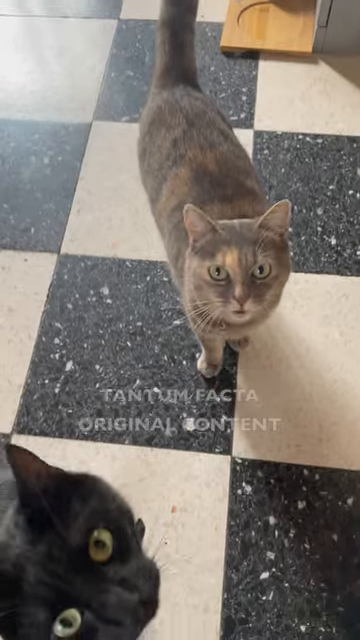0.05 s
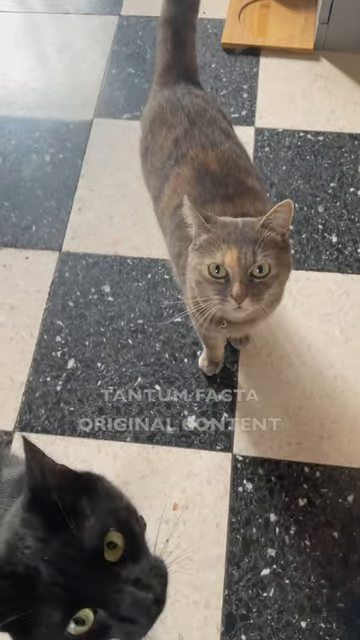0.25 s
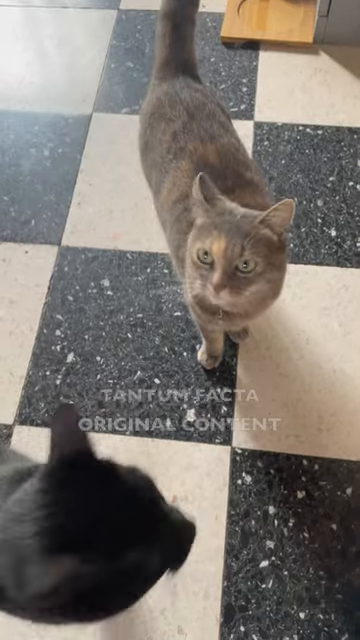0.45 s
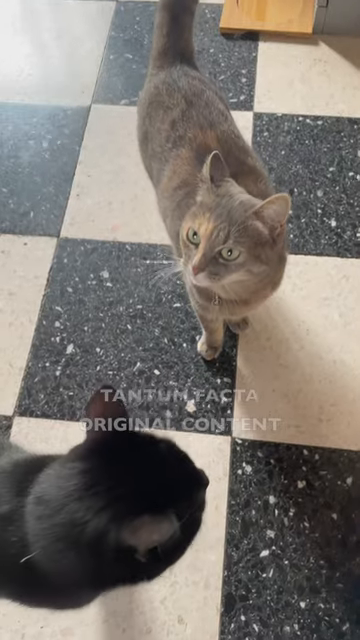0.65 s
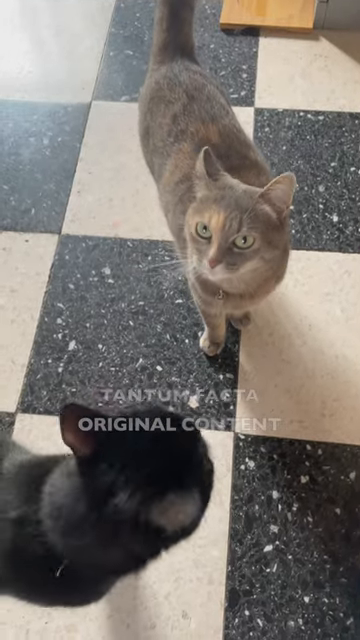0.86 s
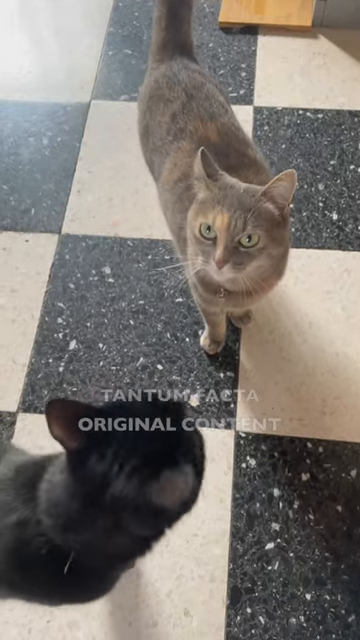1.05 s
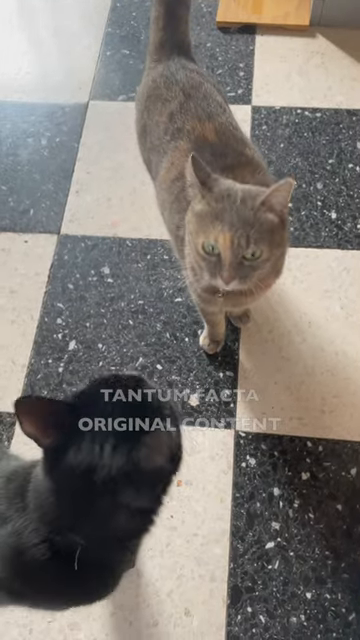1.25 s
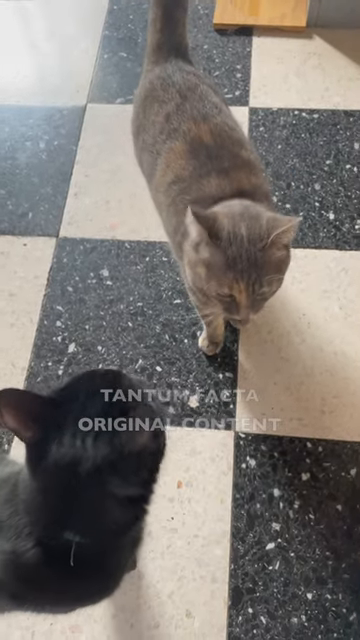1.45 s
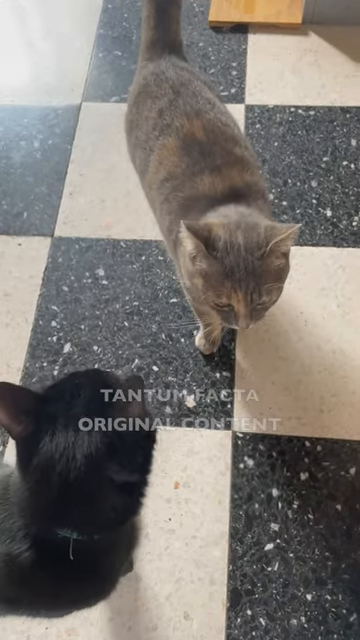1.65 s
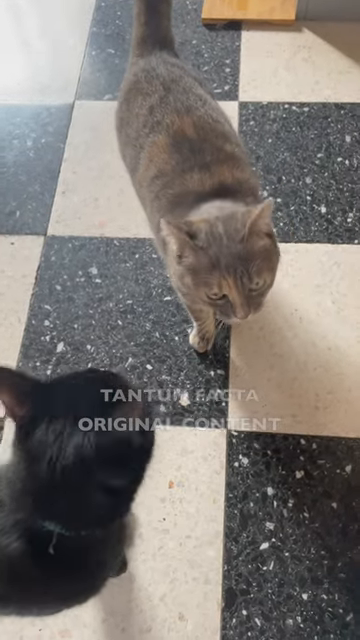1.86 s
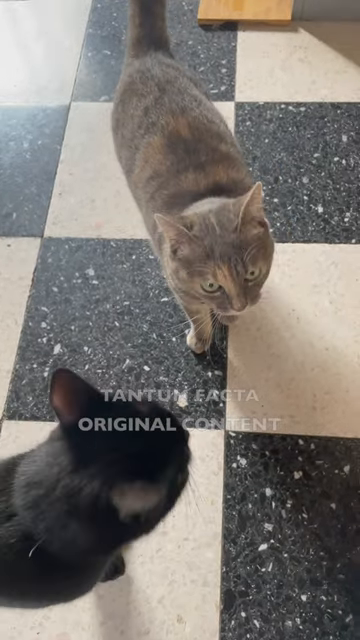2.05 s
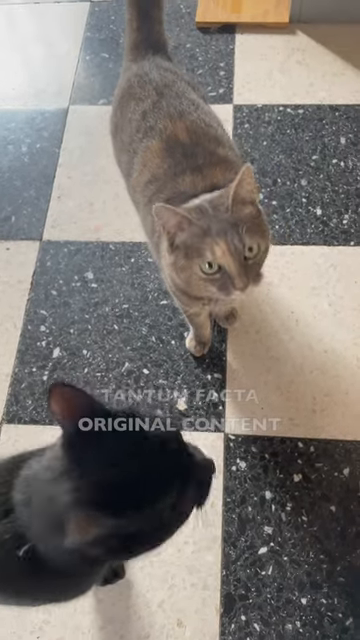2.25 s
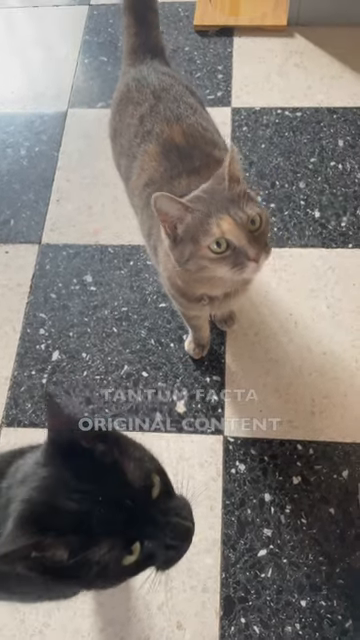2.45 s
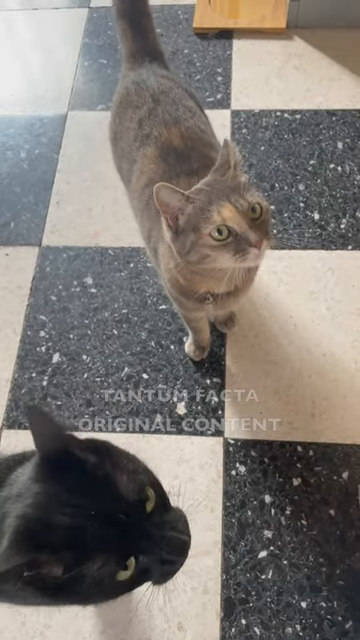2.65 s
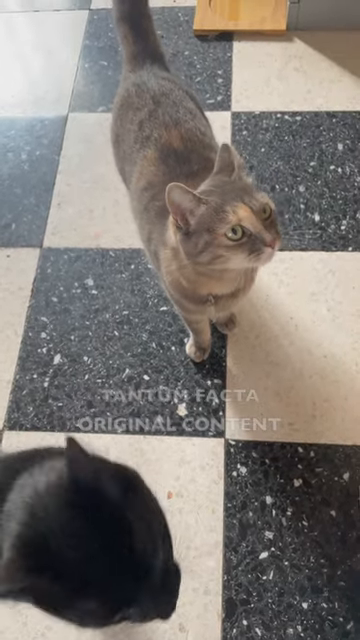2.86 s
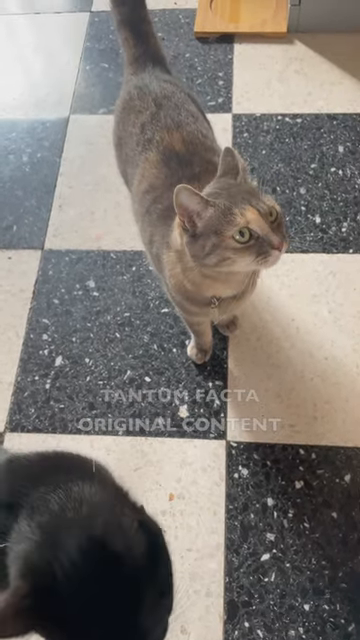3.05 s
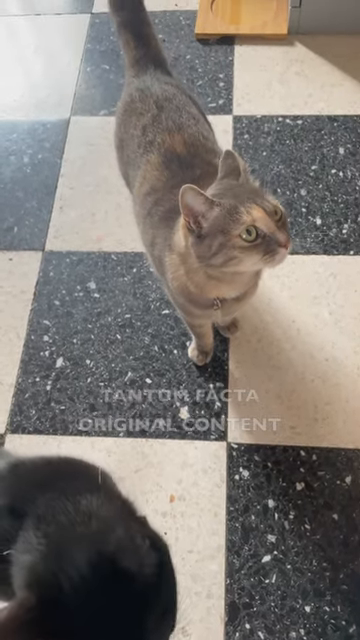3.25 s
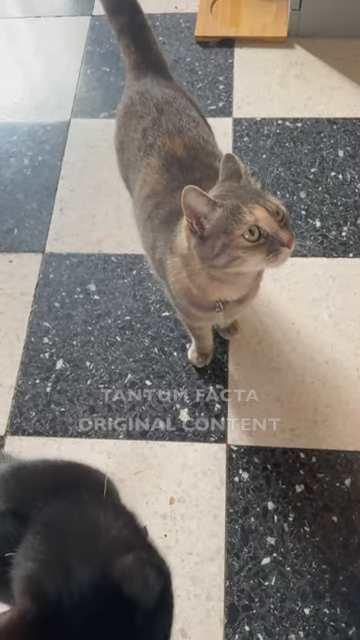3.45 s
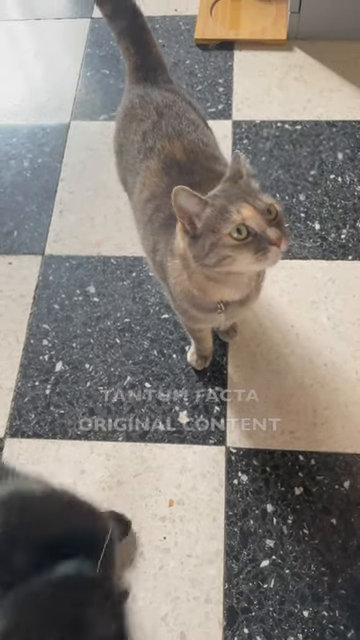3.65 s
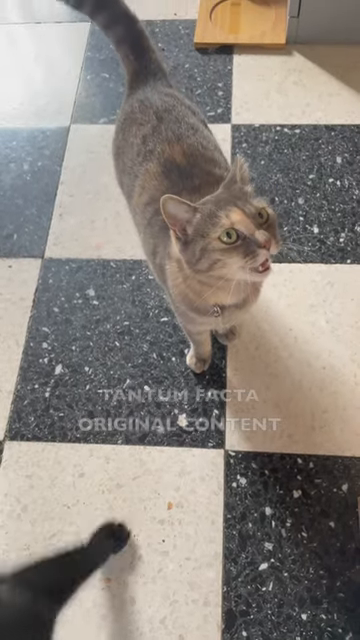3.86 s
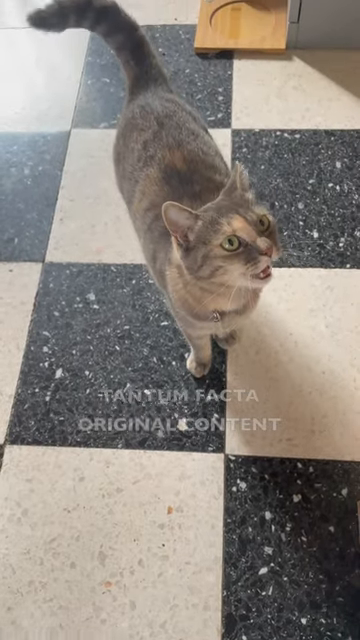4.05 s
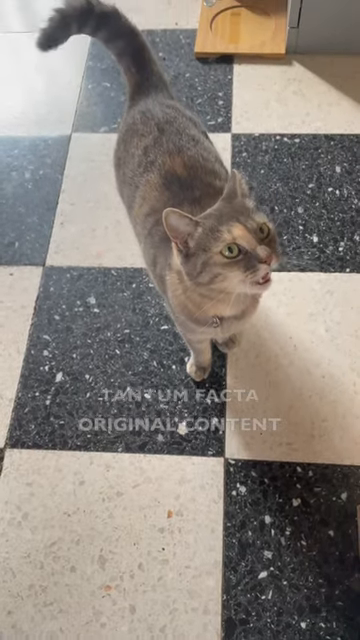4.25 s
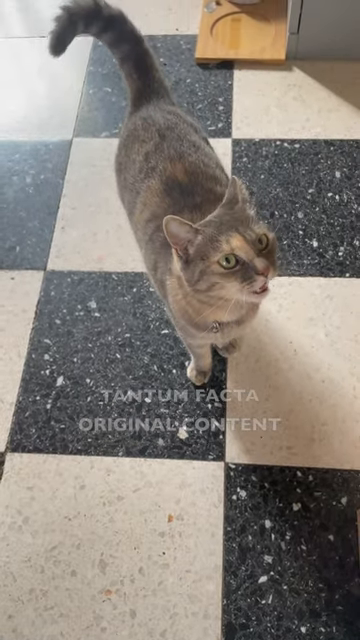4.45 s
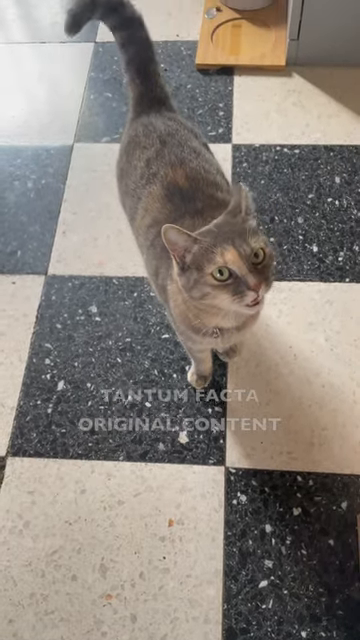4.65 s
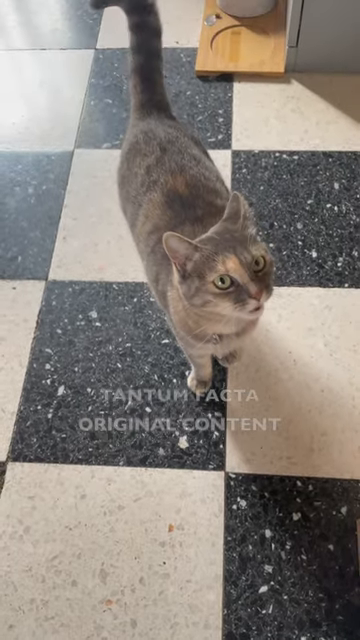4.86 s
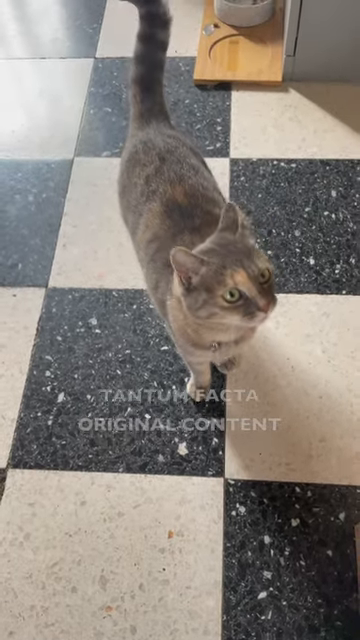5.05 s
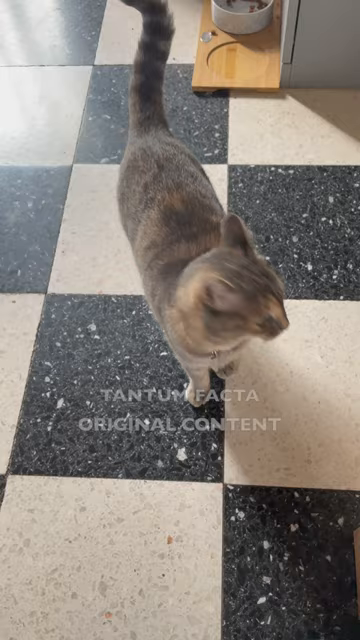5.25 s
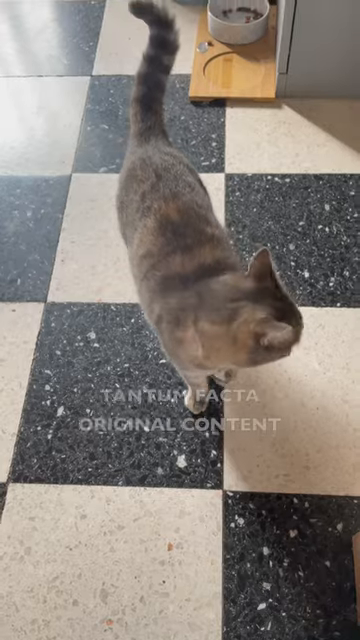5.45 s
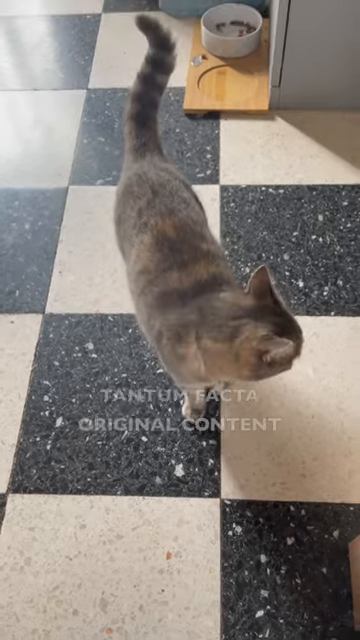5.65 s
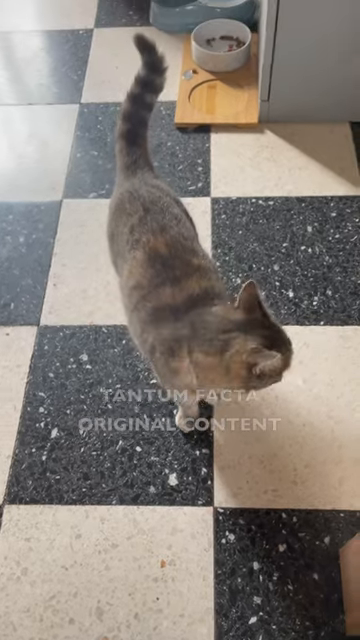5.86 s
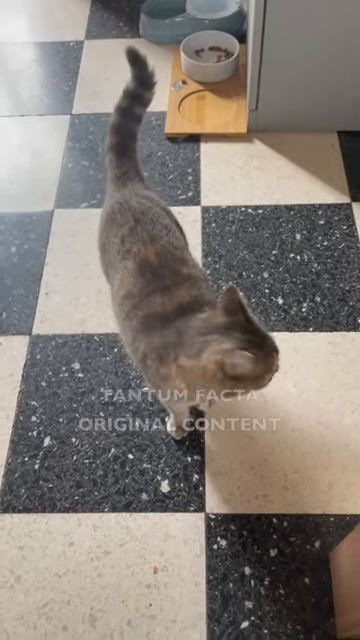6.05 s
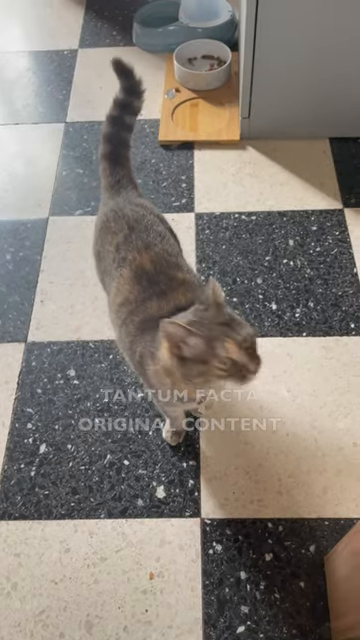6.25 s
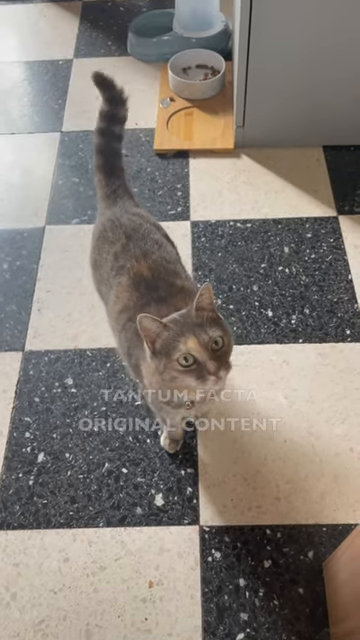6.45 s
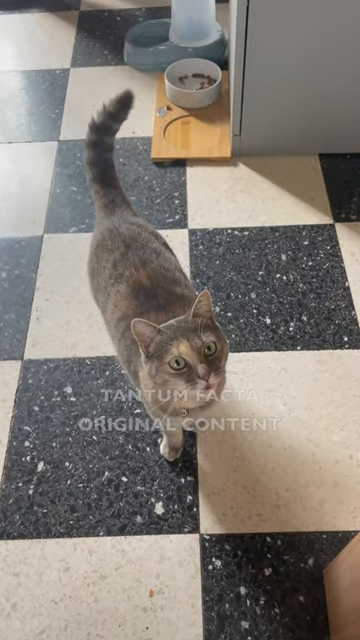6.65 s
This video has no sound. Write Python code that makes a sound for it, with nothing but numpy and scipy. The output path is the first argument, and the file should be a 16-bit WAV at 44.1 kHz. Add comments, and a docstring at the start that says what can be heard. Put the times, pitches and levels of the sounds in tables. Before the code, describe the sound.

A refrigerator hums low and steady with a faint high buzz throughout, in a kitchen with a slight echo. Close to the microphone, the clipped end of a cat's meow sounds right at the start. At about 0.5 seconds a cat sneezes with a tiny falling whistle. From 1.4 to 2.2 seconds comes a meow that rises and falls, cracking into rasp, and ends with a soft thump and a sharp claw click. Claws tick and paws scuff on tile until about 3.6 seconds. A second cat gives a louder, drawn-out meow from 3.7 to 4.9 seconds, finishing with a short snort. Between 5 and 6.3 seconds there are more light ticks and faint fur rustles, while the refrigerator's buzz grows slightly. At 6.5 seconds a last meow starts to rise and is cut off.

```python
"""A clipped meow over a humming refrigerator, then three more meows from two cats on a hard tiled
kitchen floor, close to a two-port handheld microphone. Each voice is a stack of partials shaped by
mouth and throat, cracking into rasp. Claws tick and paws drag on the tiles, a cat sneezes through a
whistling nostril, and short noise bands make air, fur rustles, a low thump and a knock. The compressor
rings the refrigerator's shell, a buzz that reaches the microphone mostly off the walls."""
import sys
import numpy as np
from scipy import signal
from scipy.fft import rfft, irfft
from scipy.io import wavfile
from scipy.ndimage import uniform_filter1d

SR = 44100
rng = np.random.default_rng(int(sys.argv[2]) if len(sys.argv) > 2 else 0)


def master(y):
    """Save y as 16-bit WAV."""
    cut = np.clip(np.atleast_2d(y).T, -1, 1)
    pcm = np.round(cut * 32767)  # scale
    wavfile.write(sys.argv[1], SR, pcm.astype(np.int16))


N = 296352
EDGE_HZ = 15900  # top of the microphone's band
# claws on tile: (time [s], level [dB], pitch [Hz], length [cycles], left over right [dB], crack [dB])
CLAW_TICKS = [(0.3086, -41, 3320, 2.1, -5, -30), (1.1135, -42.5, 2660, 13, -10, -23.5),
              (2.169, -10.5, 2720, 9.8, 4.5, -9), (2.5409, -21.5, 2590, 3.1, 2.5, -20),
              (2.5678, -23, 1590, 2.1, 1.5, -6.5), (2.6993, -33, 1110, 2.8, 2, -10.5),
              (2.748, -21.5, 2599, 9.5, 3.5, -13), (2.848, -41, 2670, 9, 7, -27),
              (3.552, -22, 1922, 3.3, 6, -32), (3.5978, -20, 2388, 1.2, 1.5, -12.5),
              (5.1685, -22.5, 1810, 1.8, 4, -25), (5.7843, -32, 1100, 1.9, -3, -15),
              (5.9597, -32.5, 1650, 5.3, 4.5, -2), (6.085, -37, 2500, 4.3, -1, -11),
              (6.1724, -17, 1886, 2.13, 3.5, -1.5), (6.251, -32.5, 1490, 1.7, 2.5, -15)]


def gain_of(db):
    """Decibels to amplitude."""
    return 10 ** (np.asarray(db) / 20)


def unit_rms(x):
    """Scales to rms 1."""
    return x / np.sqrt(np.mean(x ** 2) + 1e-20)


def value_at(points, hz):
    """Table value on a log-frequency axis."""
    f, value = np.transpose(points)
    return np.interp(np.log(hz + 1), np.log(f + 1), value)


def add(mix, start, sound):
    """Mixes a sound in at a start time in seconds."""
    part = mix[..., round(start * SR):][..., :sound.shape[-1]]
    part += sound[..., :part.shape[-1]]


def drift(count, per_s):
    """Slow random curve of rms 1."""
    span = max(int(SR / per_s / 2), 2)
    noise = rng.standard_normal(count + 2 * span)
    return unit_rms(uniform_filter1d(uniform_filter1d(noise, span), span)[span:-span])


def resonate(x, hz, width):
    """Two like resonances in series, gain 1 at the centre."""
    peak = signal.iirpeak(hz, hz / width, SR)
    return signal.lfilter(*peak, signal.lfilter(*peak, x))


def swell(t, rise, t60):
    """Rises as a square, then dies exponentially."""
    return np.clip(t / max(rise, .001), 0, 1) ** 2 * gain_of(-60 * np.maximum(t - rise, 0) / t60)


def meow(contour, mouth, throat):
    """Partials on one unsteady pitch; in a crack the pitch shakes and the treble turns to breath."""
    # voice cracks: (time [s], rasp level [dB], fall t60 [s])
    breaks = [(0.0, -50, .2), (1.35, -39.5, 0.18), (1.645, -49, 0.049), (1.769, -48.5, 0.051),
              (2.052, -48.5, 0.52), (3.69, -50.5, 0.25), (4.0, -46, 0.39), (4.33, -53, 0.13),
              (6.68, -43, 0.22)]
    ring_hz, ring_width_hz, rasp_db = 1937, 400, -35
    times, *columns = np.transpose(contour)
    start, end = times[0], times[-1]
    t = np.arange(start, end, 1 / SR)
    n = len(t)
    hz, effort_db, ring_db, treble_db, opening = (np.interp(t, times, c) for c in columns)
    cracks = sum(gain_of(db) * swell(t - at, 0.024, t60) for at, db, t60 in breaks)
    cracked = cracks / (cracks + gain_of(effort_db + rasp_db + 12))  # 0 clean, 1 broken
    flutter_db, breathy_db = 4 * cracked, 6 * cracked
    jitter = (0.0028 + 0.004 * cracked) * drift(n, 69) + 0.0027 * drift(n, 21.6)
    turns = np.cumsum(hz * (1 + jitter)) / SR
    voice = 0
    for k in range(1, 6):  # lower partials: set by the mouth, or by the ring when near it
        in_ring = np.exp(-((k * hz - ring_hz) / ring_width_hz) ** 4)
        bright_db = (k > 3) * 0.41 * (treble_db - effort_db)
        mouth_db = effort_db + bright_db + value_at(mouth, k * hz / opening)
        db = in_ring * ring_db + (1 - in_ring) * mouth_db
        db += (0.58 * k - 0.3) * drift(n, 19)
        db += (0.36 * (k - 1) + flutter_db * (k > 2)) * drift(n, 90)
        voice += gain_of(db) * np.cos(2 * np.pi * (k * turns + rng.random()))
    for k in range(6, 28):  # upper partials: set by the throat, each wavering on its own
        db = treble_db - 6.5 - breathy_db + value_at(throat, k * hz / opening)
        db += 3.6 * drift(n, 11.4) + (1.8 + flutter_db) * drift(n, 90)
        voice += gain_of(db) * np.cos(2 * np.pi * (k * turns + rng.random())) * (k * hz < EDGE_HZ)
    breath = rng.standard_normal(n) * (1 + np.cos(2 * np.pi * turns))  # gated by each cycle
    throat_gain = gain_of(value_at(throat, np.fft.rfftfreq(n, 1 / SR)))
    hiss = unit_rms(irfft(rfft(breath) * throat_gain, n)) * gain_of(treble_db - 13 + breathy_db)
    rasp = unit_rms(resonate(breath, hz=1810, width=260))  # the first throat resonance
    rasp *= (cracks + gain_of(effort_db + rasp_db)) * gain_of(2.2 * drift(n, 30))
    fade_in = (t - start) / .004 + (start < .001)  # no fades at the ends of the scene
    fade_out = (end - t) / .008 + (end > N / SR - .01)
    fade = np.clip(np.minimum(fade_in, fade_out), 0, 1)
    return start, (np.sqrt(2) * voice + hiss + rasp) * fade


def cats():
    """Two cats call twice each, each through its own mouth and throat resonances."""
    # per meow: (time [s], pitch [Hz], effort [dB], ring near 2 kHz [dB], treble [dB],
    # mouth opening [factor on the resonances])
    contours = [
        [(0.0, 687, -33.5, -40, -39, 0.91), (0.02, 724, -36.5, -45, -46, 0.93),
         (0.045, 770, -52, -52, -42.5, 1.0)],
        [(1.35, 533, -45, -54.5, -51.5, 1.0), (1.36, 570, -46, -35, -50.5, 0.99),
         (1.4, 642, -42, -34, -42.5, 0.96), (1.448, 688.9, -35.5, -22, -46.5, 0.99),
         (1.53, 736, -35, -18.5, -33, 1.0), (1.618, 749.3, -39.5, -13, -28.5, 0.98),
         (1.646, 746.5, -38, -7.5, -31.5, 1.0)] + [(1.654, 721, -30.5, -21, -31.5, 1.0),
         (1.666, 711, -34.5, -17.5, -35, 1.0), (1.718, 746.5, -36.5, -18.5, -27, 0.99),
         (1.77, 730, -33, -14.5, -35, 1.0)] + [(1.781, 685, -34.5, -24, -32.5, 1.07),
         (1.861, 678.4, -36, -22, -41.5, 1.15), (1.887, 685, -36, -20, -39.5, 1.14),
         (1.911, 692.4, -33.5, -26, -41, 1.2), (2.027, 672, -36, -29, -43.5, 1.19),
         (2.05, 677, -37, -30.5, -47.5, 1.28)] + [(2.125, 621.4, -39, -43, -50, 1.22),
         (2.17, 606, -39.5, -43, -64, 1.14), (2.2, 630, -41.5, -56, -68, 1.2),
         (2.217, 729, -41, -59.5, -74, 1.3), (2.232, 850, -65.5, -68, -80, 1.14)],
        [(3.656, 494, -62, -71, -82, 0.81)] + [(3.668, 501, -34.5, -56, -52, 0.9),
         (3.686, 565.7, -35, -50, -47.5, 1.0), (3.744, 597, -39, -28, -39, 0.99),
         (3.8, 621, -33.5, -26, -44, 0.99), (3.95, 653, -30, -16.5, -35.5, 1.0),
         (3.982, 652.7, -28.5, -18.5, -37.5, 1.0),
         (4.0, 671.7, -28.5, -25, -45, 0.99)] + [(4.03, 667.2, -29, -24.5, -40, 0.99),
         (4.074, 675, -27, -26.5, -37, 0.99), (4.39, 670.8, -25.5, -31, -38, 0.98),
         (4.488, 669.9, -27, -27.5, -39.5, 0.98), (4.568, 671, -27, -34.5, -39, 1.0),
         (4.636, 654.3, -28, -20.5, -37, 0.99), (4.752, 622.4, -30.5, -24.5, -42, 0.98),
         (4.802, 607.9, -35.5, -25, -36.5, 1.0),
         (4.83, 612, -34, -34, -42, 0.99)] + [(4.845, 650, -34, -45, -57.5, 0.98),
         (4.862, 650, -51, -54, -66, 0.78)],
        [(6.53, 457, -58, -66, -65, 0.94), (6.54, 488, -43, -85, -73, 0.96), (6.552, 495, -40.5, -62, -58, 1.0),
         (6.6, 546.6, -39.5, -52, -52, 0.94), (6.668, 616.4, -38.5, -28, -40, 1.0),
         (6.72, 661, -31, -34, -32.5, 1.0)],
    ]
    # lower and upper resonances, per cat: (frequency [Hz], gain [dB])
    mouths = [
        [(500, -10.5), (750, -5), (1100, 2.5), (1500, -2), (2400, -14), (2750, 2), (3000, 3.5), (3400, -8),
         (3750, -6.5)],
        [(500, 0), (680, -17.5), (1000, 3.5), (1400, -1.5), (2400, -10), (2700, -16.5), (2870, 9), (3100, -5),
         (3400, -8.5)],
    ]
    throats = [
        [(2400, -11.5), (3000, 3.5), (3700, -4.5), (4400, -5), (5200, 2), (6000, 5), (6800, -4), (7600, -29.5),
         (8600, -40.5), (10500, -30.5), (13000, -42.5), (16500, -31)],
        [(2400, -0.5), (3300, -4.5), (4000, 0), (4700, -11), (5400, -5.5), (6100, 1.5), (7300, 5.5),
         (8200, -18), (9500, -8), (11000, -30.5), (13000, -31.5), (16500, -28.5)],
    ]
    voices = np.zeros(N)
    for contour, cat in zip(contours, [0, 0, 1, 1]):
        add(voices, *meow(contour, mouths[cat], throats[cat]))
    return voices


def fridge():
    """Wavering hum tones, and one knock per compressor turn ringing the shell."""
    # hum tones: (frequency [Hz], level [dB], waver [dB], waver rate [1/s])
    tones = [(72, -49.5, 0.5, 3), (100.3, -46, 1, 3.8), (119.1, -54.5, 1.5, 6.9), (145.3, -63, 0.5, 3.1),
             (292.5, -63, -0.5, 4.5), (341, -73, 4, 1.5), (441.7, -65.5, 2, 3.18), (589, -69, 5, 3.1),
             (608, -73, 8, 2.7)]
    # shell resonances: (frequency [Hz], width [Hz], gain [dB])
    shell_rings = [(3305, 360, -2.5), (6536, 450, -8.5)]
    # course of the buzz: (time [s], shell level [dB], whine level [dB])
    buzz_levels = [(0, -56.5, -68), (1.5, -58.5, -78.5), (3.2, -59.5, -68), (5.1, -56.5, -63),
                   (5.6, -56, -63), (6.1, -52.5, -53), (6.72, -55.5, -60)]
    mains_hz, knock_hz = 200.03, 49.2
    t = np.arange(N) / SR
    hum = 0
    for hz, db, waver_db, per_s in tones:
        level = gain_of(db + waver_db * drift(N, per_s))
        hum += level * np.sin(2 * np.pi * hz * t + 0.76 * drift(N, per_s))
    mains_level = gain_of(-39.5 + 2.5 * drift(N, 6.8))  # the strongest tone
    hum += mains_level * np.sin(2 * np.pi * mains_hz * t + 0.34 * drift(N, 8.2))
    knocks = np.diff(np.floor(knock_hz * t), prepend=0) + 0.0061 * rng.standard_normal(N)
    times, shell_db, whine_db = np.transpose(buzz_levels)
    buzz = sum(gain_of(db) * unit_rms(resonate(knocks, hz, width)) for hz, width, db in shell_rings)
    buzz *= gain_of(np.interp(t, times, shell_db))
    whine = unit_rms(resonate(knocks, hz=3248, width=50)) * gain_of(np.interp(t, times, whine_db))
    return np.sqrt(2) * hum + whine + 0.08 * buzz + kitchen(buzz).mean(0)


def room_tone():
    """Low room noise in drifting patches, part alike at both ports and part opposite."""
    # spectra of the two parts: (frequency [Hz], relative density [dB])
    alike_spectrum = [(12, -62), (25, -37), (45, -14.5), (87, -7), (166, -34), (182, -8), (204, -9),
                      (232, -23), (292, -20), (388, -26), (602, -28.5), (1730, -44), (3950, -51),
                      (6620, -46), (8300, -58.5), (9500, -82.5), (12400, -104)]
    opposite_spectrum = [(18, -51), (30, -24), (199, -9), (473, -5), (889, -9), (1220, -13.5), (2680, -28),
                         (3310, -6), (4190, -27.5), (6550, -21), (16000, -47)]
    frames, hz = N // 512 + 5, np.fft.rfftfreq(2048, 1 / SR)
    a, b, c, d, patches = rng.standard_normal((frames, 1025, 5)).T
    patches = unit_rms(uniform_filter1d(uniform_filter1d(patches, size=20, axis=0), size=6, axis=1))
    spectra = np.array([(a + 1j * b) * gain_of(value_at(alike_spectrum, hz))[:, None],
                        (c + 1j * d) * gain_of(value_at(opposite_spectrum, hz))[:, None]])
    spectra *= gain_of(3.15 * patches)
    alike, opposite = signal.istft(spectra, nperseg=2048, noverlap=1536)[1][:, :N]
    return gain_of(-46) * unit_rms(alike) + gain_of(-55.5) * unit_rms(opposite) * [[1], [-1]]


def noise_band(db, rise, t60, hz, octaves):
    """Noise in one band that swells and dies."""
    t = np.arange(round((rise + t60) * SR)) / SR
    f = np.fft.rfftfreq(len(t), 1 / SR) + 1
    band = np.exp(-(np.log2(f / hz) / octaves) ** 2)
    noise = unit_rms(irfft(rfft(rng.standard_normal(len(t))) * band, len(t)))
    return gain_of(db + 2.3 * drift(len(t), 130)) * noise * swell(t, rise, t60)


def snort(db, rise, t60):
    """A burst of air rings the cat's nose."""
    # nasal resonances: (frequency [Hz], width [Hz], gain [dB])
    nose_rings = [(2930, 250, 0.5), (3740, 980, 1.5), (6825, 910, -5.5)]
    t = np.arange(round((rise + t60) * SR)) / SR
    air = rng.standard_normal(len(t))
    nose = sum(gain_of(ring_db) * unit_rms(resonate(air, hz, width)) for hz, width, ring_db in nose_rings)
    return gain_of(db) * nose * swell(t, rise, t60)


def claw_tick(db, hz, cycles, pan_db, crack_db):
    """A few dry cycles of claw on tile, a sharp crack, and one early bounce."""
    t = np.arange(round(.03 * SR)) / SR
    length = max(cycles, .8) / hz
    blow = np.sin(2 * np.pi * hz * t) * np.exp(-((t - .5 * length) / (0.32 * length)) ** 2)
    crack = resonate(rng.standard_normal(len(t)), hz=4000, width=5000)
    crack *= np.clip(t / (0.6 * length), 0, 1) ** 4
    blow += gain_of(crack_db + 6.5 - 60 * abs(t - 0.53 * length) / 0.0093) * crack
    bounce = 0.3 * np.roll(blow, round(0.0044 * SR))
    return sides(pan_db) * gain_of(db) * (blow + bounce)


def rustles():
    """Noise band rows: a paw drag at each tick, louder at a hard one, and faint fur at random."""
    drags = [(start, -40 + 0.39 * db, .005, .22, 2400, 1.0) for start, db, *_ in CLAW_TICKS]
    fur = [(when * N / SR, -69 + 8 * force, .03, 0.082 + 0.31 * length, 2600 * 3.4 ** (pitch - .5), .7)
           for when, force, length, pitch in rng.random((16, 4))]
    return drags + fur


def nostril_whistle():
    """The sneeze whistles through a nostril, falling and unsteady."""
    # glide: (time [s], pitch [Hz], level [dB])
    glide = [(0.529, 2564, -38), (0.539, 2320, -38.5), (.548, 1586, -30), (0.559, 1492, -28.5),
             (.565, 1397, -32.5), (0.573, 1340, -34.5), (.6, 1340, -53)]
    # partials from the first up: (gain [dB])
    partials_db = [-7.5, 3.5, 4, -3, -1.5]
    times, hz, db = np.transpose(glide)
    t = np.arange(times[0], times[-1], 1 / SR)
    turns = np.cumsum(np.interp(t, times, hz) * (1 + 0.039 * drift(len(t), 400))) / SR
    tone = sum(gain_of(partial_db + 1.3 * drift(len(t), 120)) * np.sin(2 * np.pi * k * turns)
               for k, partial_db in enumerate(partials_db, 1))
    return times[0], gain_of(np.interp(t, times, db)) * tone


def kitchen(x):
    """Echoes off tile and walls: sparse reflections of random sign, each band dying at its own speed."""
    # room decay: (frequency [Hz], t60 [s])
    decay = [(300, 0.17), (1000, 0.65), (3000, 0.47), (8000, 0.32)]
    taps = np.zeros((2, SR // 2))
    at = np.arange(200, SR // 2 - 20, 20)
    at = at + rng.integers(0, 20, (2, len(at)))
    np.put_along_axis(taps, at, rng.choice([-1., 1.], at.shape), 1)
    taps[1] = 1.2 * taps[0] + .5 * taps[1]  # the right side is louder and mostly like the left
    hz, t, spectra = signal.stft(taps, SR, nperseg=256)
    tail = signal.istft(spectra * gain_of(-60 * t / value_at(decay, hz)[:, None]), SR, nperseg=256)[1]
    return signal.fftconvolve(np.atleast_2d(x), tail / np.linalg.norm(tail[0]), axes=1)[:, :N]


def sides(pan_db):
    """Left and right gains for a level difference."""
    return gain_of([[pan_db / 2], [-pan_db / 2]])


def microphone_ports(x):
    """The two openings hear sounds shifted in phase, opposite in the treble, where level cues fade."""
    # phase between the ports: (frequency [Hz], left lead [rad])
    phase_lead = [(60, .08), (200, 0.063), (500, 0.72), (1300, 0.17), (2000, 0.38), (3500, 1.72),
                  (6000, 1.38), (8200, 2.18), (9500, 2.82), (10500, 3.14), (12500, 3.14), (15000, 2.44)]
    hz = np.fft.rfftfreq(N, 1 / SR)
    left, right = rfft(x)
    mid = (left + right) / 2
    side = (left - right) / 2 / (1 + (hz / 5000) ** 4)
    turn = np.exp(.5j * value_at(phase_lead, hz))
    return irfft([(mid + side) * turn, (mid - side) / turn], N)


def scene():
    """Cats close to the microphone, with their echoes, over refrigerator and room tone."""
    # short noise bands (air, rustles, a low thump, a knock, the meow's closing flick):
    # (time [s], level [dB], rise [s], fall t60 [s], centre [Hz], width [octaves])
    bands = [(0.029, -34, 0.0073, 0.14, 3940, 1.02), (.522, -35, .002, .25, 5500, .8),
             (.523, -30, .012, .22, 14500, .25), (.53, -26, 0.022, 0.21, 4600, 1.36),
             (.59, -48, 0.036, 0.43, 4070, 0.97), (2.05, -33, 0.004, 0.14, 1040, 0.22),
             (2.065, -37, 0.012, 0.15, 85, 0.5), (2.21, -37, 0.012, 0.076, 840, 0.29),
             (2.1, -43.5, .05, 0.58, 4005, 0.93), (2.34, -52.5, 0.023, 0.19, 4140, 0.41),
             (2.99, -59, 0.056, .5, 5630, .3), (2.3, -52, 0.04, 0.99, 1050, 0.57),
             (2.62, -51, 0.034, 0.32, 2650, 0.41), (2.84, -48.5, 0.048, 0.18, 2620, 0.416),
             (3.57, -37.5, 0.026, 0.065, 2166, 0.56), (4.845, -42, 0.018, 0.115, 4460, 1.7),
             (4.97, -43, 0.0038, 0.069, 1840, 1.3), (5.11, -45.5, 0.019, 0.29, 3000, 2.4),
             (5.665, -49, 0.014, 0.17, 2450, 1.25), (5.8, -53, 0.0043, 0.97, 1080, 0.61),
             (5.615, -56, 0.0046, 0.08, 1520, 0.7), (5.965, -43.5, 0.0048, 0.15, 1053, 0.051),
             (5.85, -54, 0.039, 1, 3460, 1), (5.95, -41, 0.003, 0.19, 3450, 1.7),
             (6.06, -45.5, 0.0055, 0.28, 2300, 2.1), (6.175, -41, 0.0043, 0.48, 4530, 1.25),
             (6.215, -38, 0.016, 0.12, 2400, 1.5), (6.22, -41, 0.0103, 0.18, 9900, 0.5)]
    # snorts through the nose: (time [s], level [dB], rise [s], fall t60 [s])
    snorts = [(.03, -37, 0.027, 0.12), (.535, -30, 0.0038, 0.06), (4.848, -29, 0.015, 0.14)]
    voices = cats()
    noises = np.zeros((2, N))
    for table, source in [(CLAW_TICKS, claw_tick), (bands + rustles(), noise_band), (snorts, snort)]:
        for start, *row in table:
            add(noises, start, source(*row))
    add(noises, *nostril_whistle())
    echoes = gain_of(-18) * kitchen(voices) + gain_of(-15) * kitchen(noises)
    direct = voices * sides(pan_db=-2.2) + noises
    return microphone_ports(direct + echoes + fridge()) + room_tone()


def record(dry):
    """A steep low-pass at the top of the microphone's band."""
    lowpass = signal.firwin(511, EDGE_HZ, window=("kaiser", 9), fs=SR)
    return signal.oaconvolve(dry, lowpass[None], "same")


dry = scene()
out = record(dry)
master(out)
```